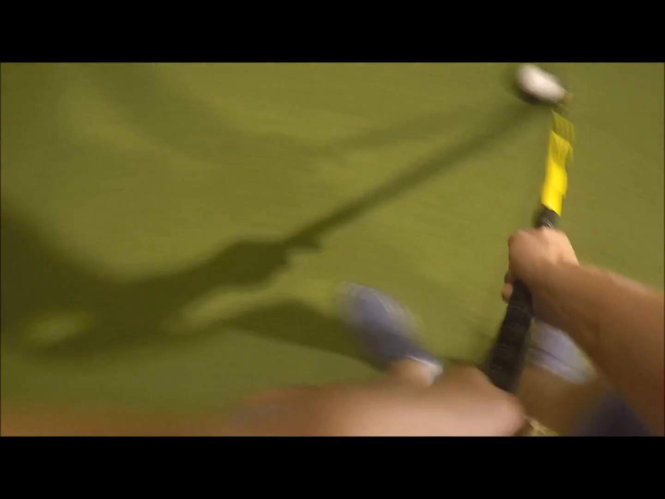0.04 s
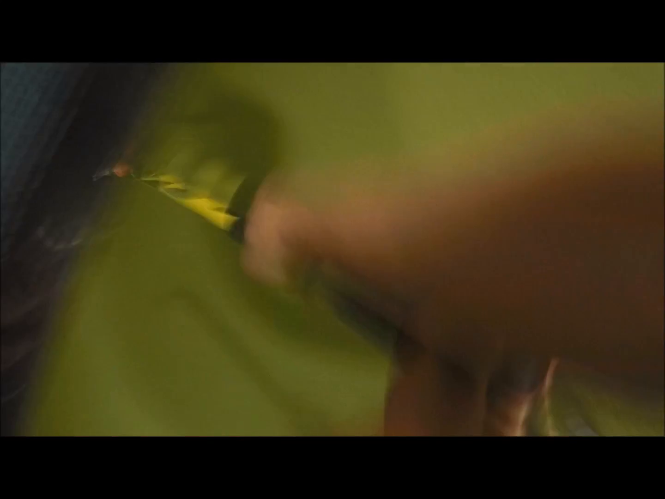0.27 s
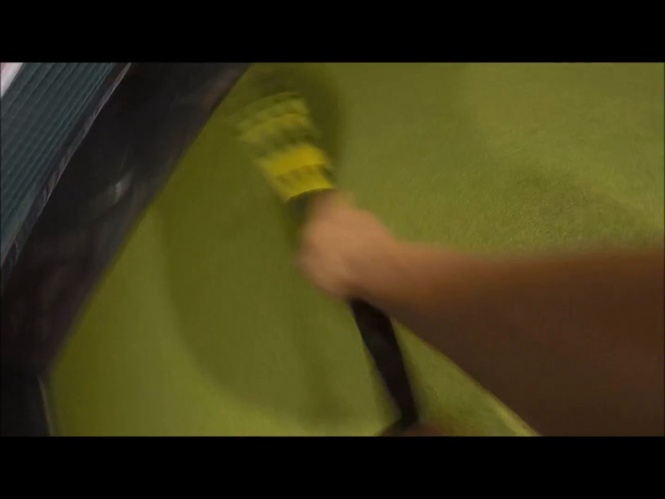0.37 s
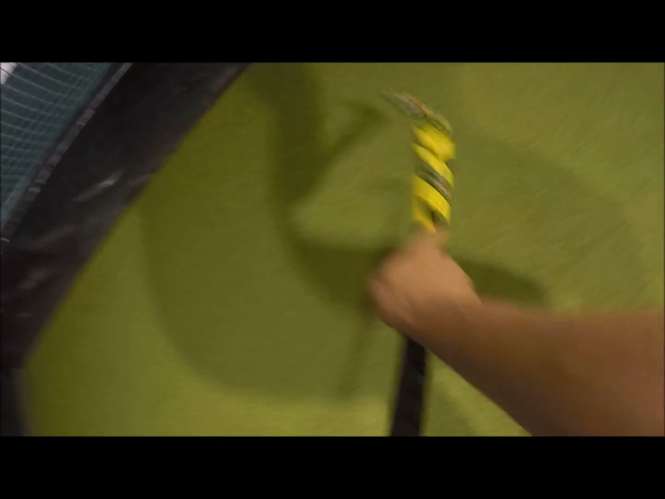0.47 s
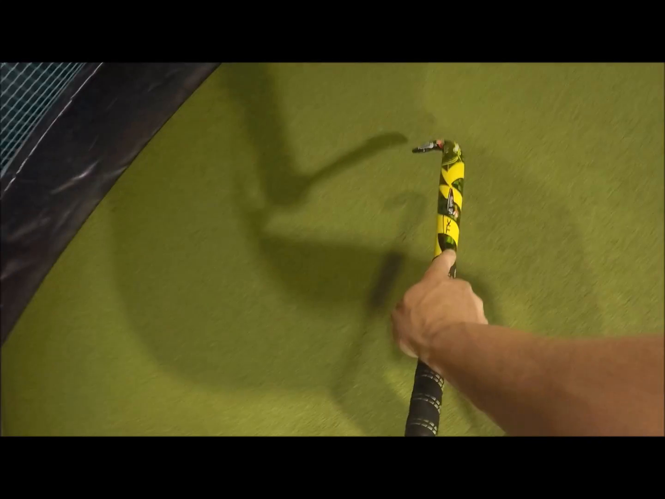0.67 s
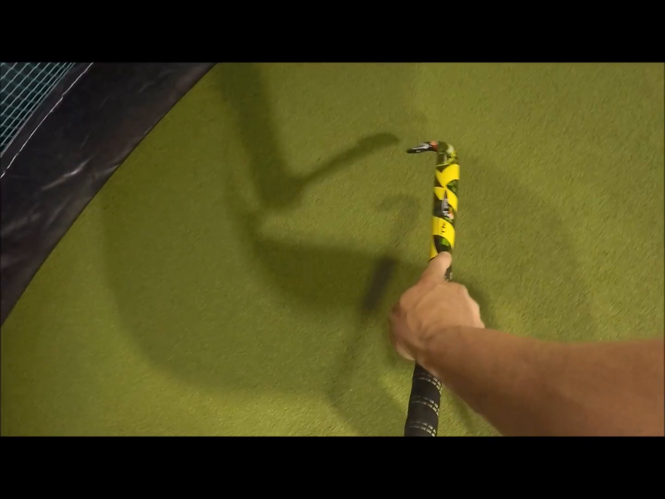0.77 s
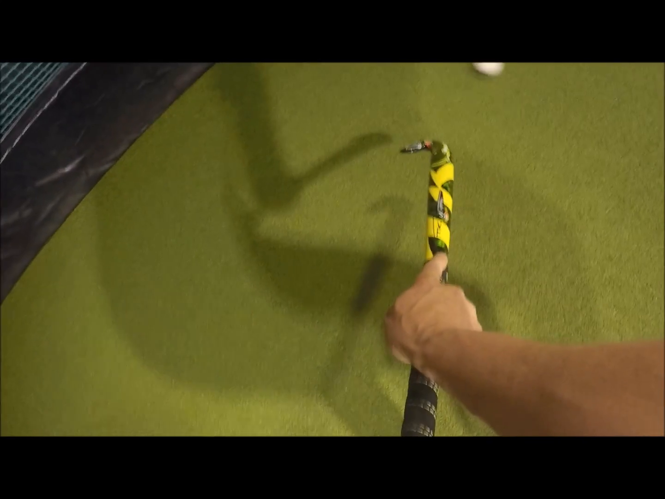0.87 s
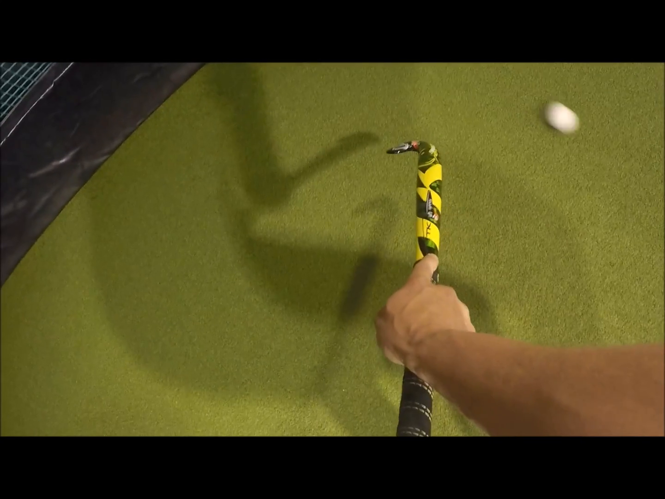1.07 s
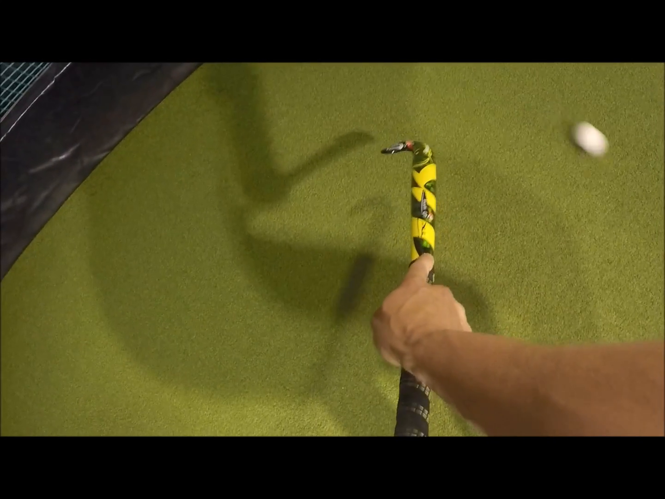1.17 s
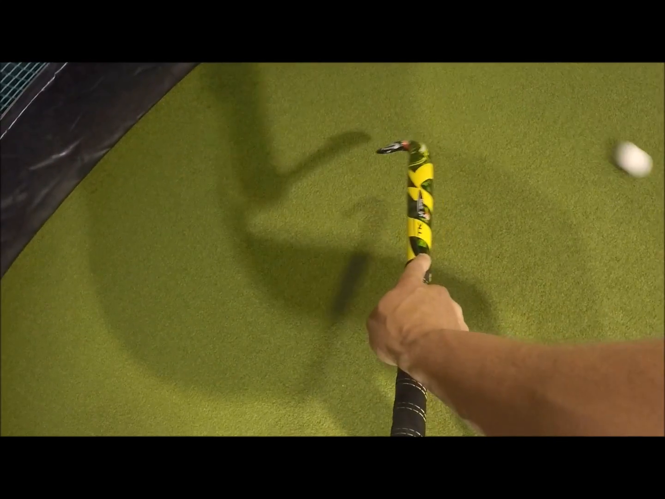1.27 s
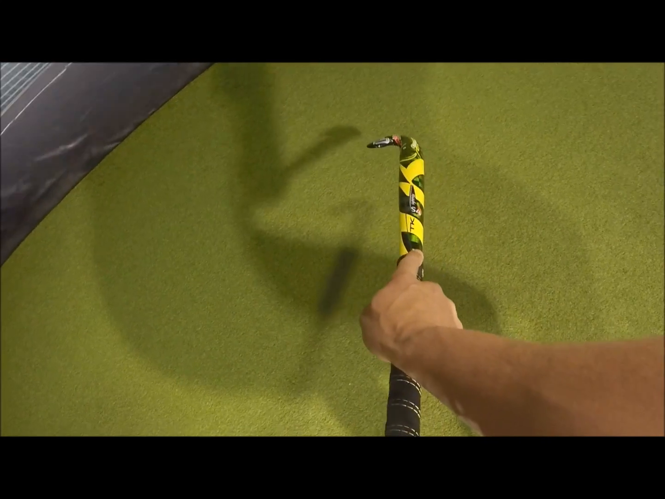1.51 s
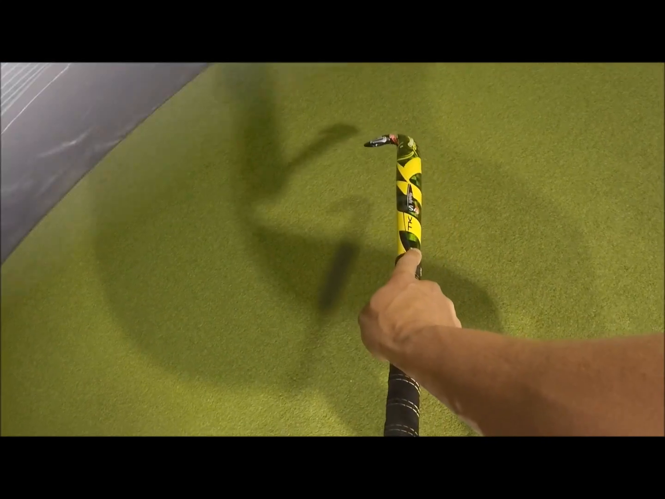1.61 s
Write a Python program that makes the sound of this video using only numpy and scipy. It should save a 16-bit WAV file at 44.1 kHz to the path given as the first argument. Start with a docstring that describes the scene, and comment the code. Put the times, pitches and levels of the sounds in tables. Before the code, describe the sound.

Sharp hockey stick knocks on a hard ball briefly overload a close microphone on an outdoor pitch. The ball slams a padded barrier with rattling netting, more clacks follow, then it lands softly and rolls over faint hiss.

```python
"""A hockey stick scuffs over artificial turf and strikes a hard ball in sharp, clattering knocks,
each one ringing the stick's modes. The ball slams into the padded pitch barrier, which booms while
its netting rattles, and the stick clacks twice more. In the quiet the ball thuds down and rolls back;
grit ticks, and a soft low pop follows over faint outdoor hiss, hum and whine.
The body-worn microphone overloads on the loudest blows."""
import sys
import numpy as np
from scipy import signal
from scipy.fft import rfft, irfft, next_fast_len
from scipy.io import wavfile
from scipy.ndimage import map_coordinates

SR = 44100
rng = np.random.default_rng(int(sys.argv[2]) if len(sys.argv) > 2 else 0)


def persist_wave(psi):
    """Save psi, clipped to +-1, as 16-bit WAV."""
    counts = np.round(np.clip(psi, -1, 1) * 32767).astype(np.int16)
    wavfile.write(sys.argv[1], SR, np.atleast_2d(counts).T)


N = 72765
CONTACT_ATTACK_S = 0.00067


def amp(db):
    """Decibels to gain."""
    return 10 ** (np.asarray(db) / 20)


def along(points, hz):
    """Read a curve of (Hz, value) points on a log frequency axis."""
    freqs, values = np.transpose(points)
    return np.interp(np.log(hz + 1), np.log(freqs + 1), values)


def clock():
    """Time of every sample in seconds."""
    return np.arange(N) / SR


def level(points):
    """A fader ride: gain per sample from (s, dB) points."""
    return amp(np.interp(clock(), *np.transpose(points)))


def filtered(x, response):
    """Equalise x with a gain given as a function of frequency."""
    size = next_fast_len(N + SR // 4)
    return irfft(rfft(x, size) * response(np.fft.rfftfreq(size, 1 / SR)), size)[:N]


def noise(colour):
    """Noise of rms 1, coloured by (Hz, dB) points."""
    x = filtered(rng.standard_normal(N), lambda hz: amp(along(colour, hz)))
    return x / x.std()


def fading(x, t60s):
    """Let each frequency of x die away at its own speed."""
    hz, t, bands = signal.stft(x, SR, nperseg=512)
    fade = amp(-60 * t / along(t60s, hz)[:, None])
    return signal.istft(bands * fade, SR, nperseg=512)[1][:N]


def decay(t, t60):
    """Exponential fall by 60 dB in t60 seconds."""
    return np.exp(-np.log(1000) * t / t60)


def rise(t, attack_s):
    """Exponential attack from 0 towards 1."""
    return 1 - np.exp(-t / attack_s)


def ring(modes, t, attack_s):
    """A struck body: damped (Hz, dB, t60) sines under a short attack."""
    partials = (amp(db) * decay(t, t60) * np.sin(2 * np.pi * hz * t) for hz, db, t60 in modes)
    return sum(partials) * rise(t, attack_s)


def wobble(rate):
    """A smooth random curve through rate points a second."""
    return map_coordinates(rng.standard_normal(int(N * rate / SR) + 4), [clock() * rate])


def tone(hz, waver, rate):
    """A sine whose pitch wanders by about the fraction waver."""
    return np.sin(2 * np.pi * np.cumsum(hz * (1 + waver * wobble(rate))) / SR)


def add(track, start_s, sound):
    """Mix a sound into the track at start_s."""
    i = round(start_s * SR)
    track[i:i + len(sound)] += sound[:N - i]


def background():
    """A bed of outdoor hiss and low rumble, with a faint hum and a fluttering whine."""
    # fader rides of hiss, hum and whine: time_s, level_db
    hiss_ride = [(0, -55.5), (.07, -62), (.16, -60), (.6, -79), (.98, -76), (1.29, -68.5), (1.48, -70),
                 (1.65, -73)]
    hum_ride = [(.9, -100), (1.13, -75), (1.21, -67), (1.255, -71), (1.285, -58), (1.345, -57.5),
                (1.39, -88)]
    whine_ride = [(.8, -90), (.95, -81), (1.25, -76.5), (1.45, -85.5)]
    # colours of hiss and rumble: freq_hz, relative_db
    hiss_colour = [(100, -1), (300, 5), (550, -0.5), (900, -5), (1600, -7.5), (4000, -9), (7000, -19),
                   (11000, -25), (15000, -30.5), (16500, -47.5)]
    rumble_colour = [(20, -2.5), (50, 6), (130, -7), (250, -13), (450, -29), (900, -53.5)]
    # partials of the whine: pitch_hz, relative_db
    partials = [(780, 0), (1045, -5), (1390, -8.5), (1600, -7.5)]
    flutter_db, rumble_db = 4.5, -63.5
    whine = sum(amp(db + flutter_db * wobble(rate=41)) * tone(hz, waver=.02, rate=25)
                for hz, db in partials)
    hiss = level(hiss_ride) * noise(hiss_colour)
    rumble = amp(rumble_db) * noise(rumble_colour)
    hum = level(hum_ride) * tone(hz=263, waver=.008, rate=8)
    return hiss + rumble + hum + level(whine_ride) * whine


def soft_pop():
    """One soft, low pop with a tiny click on its front."""
    # partials of the pop: pitch_hz, relative_db, t60_s
    modes = [(43.9, 0.5, 0.057), (96, -7, 0.036), (232.5, 3, 0.0091), (42.4, -14, 1)]
    out, t = np.zeros(N), clock()
    body = amp(-36) * ring(modes, t, attack_s=0.00089)
    click = amp(-34) * np.exp(-t / 0.00057) * rise(t, attack_s=.00005)
    add(out, start_s=1.4032, sound=body + click)
    return out


def grit_ticks():
    """Grit ticks in tiny bursts of noise."""
    # ticks of grit: start_s, level_db
    ticks = [(.686, -57.5), (.719, -59.5), (.923, -58.5), (1.3008, -55.5)]
    # colour of a tick: freq_hz, relative_db
    colour = [(400, 0), (1500, 1), (4200, -8), (12000, -21)]
    out, t = np.zeros(N), clock()
    for start_s, db in ticks:
        add(out, start_s, amp(db) * noise(colour) * decay(t, t60=0.015) * rise(t, CONTACT_ATTACK_S))
    return out


def ball_landing():
    """The ball touches the turf, lands with a dull thud and a puff of noise, and rolls back."""
    # modes of the first touch and of the thud: pitch_hz, relative_db, t60_s
    tap_modes = [(387, -48, .035), (922, -53, .04)]
    thud_modes = [(140.2, 7.5, 0.12), (201, -3, 0.16), (248.1, -4.5, 0.18), (332, -7.5, 0.078)]
    # colours of puff and roll: freq_hz, relative_db
    puff_colour = [(80, 12.5), (300, -1), (550, -13.5), (1000, -19), (1500, -32), (12000, -50)]
    roll_colour = [(30, -5), (90, .5), (170, -5), (350, -20.5), (700, -15), (1000, -30), (2200, -33),
                   (8000, -56)]
    # swell and fade of the roll: time_s, level_db
    roll_ride = [(.82, -110), (.92, -58.5), (1.0, -58.5), (1.1, -67), (1.2, -81.5), (1.45, -101)]
    tap_s, thud_s, puff_attack_s = .789, .7945, 0.0092
    t = clock()
    out = level(roll_ride) * noise(roll_colour)
    puff = amp(-43.5) * noise(puff_colour) * decay(t, t60=0.4) * rise(t, puff_attack_s)
    add(out, thud_s - puff_attack_s, puff)
    add(out, tap_s, ring(tap_modes, t, CONTACT_ATTACK_S))
    add(out, thud_s, amp(-36.5) * ring(thud_modes, t, attack_s=0.0046))
    return out


def turf_scuff():
    """The head drags on turf, sets the shaft droning, squeaks where it presses hardest and swishes on."""
    # fader rides of drag, shaft drone and follow-through: time_s, level_db
    drag_ride = [(.176, -74), (.183, -44), (.197, -39.5), (.209, -30.5), (.216, -28.5), (.222, -34.5),
                 (.25, -48.5), (.275, -54), (.32, -55.5), (.36, -57.5), (.405, -61.5), (.45, -120)]
    drone_ride = [(.178, -73), (.19, -36), (.21, -26.5), (.222, -30.5), (.25, -41), (.275, -62.5),
                  (.33, -110)]
    swish_ride = [(.18, -110), (.225, -45), (.25, -40.5), (.29, -46.5), (.33, -45), (.375, -51),
                  (.405, -52.5), (.46, -120)]
    # colours of drag, squeak and the swish that jolts the microphone: freq_hz, relative_db
    drag_colour = [(100, -25), (280, -9.5), (470, 0.5), (660, 1), (950, -11.5), (1450, -8), (2200, -19.5),
                   (2900, -16.5), (3900, -31.5), (6500, -33.5), (15000, -46.5)]
    squeak_colour = [(3800, -35.5), (4900, 13), (5600, -8.5), (6400, -25), (16000, -43)]
    swish_colour = [(25, -6), (55, 3), (130, -6.5), (300, -12.5), (700, -28.5), (2000, -27), (15000, -51.5)]
    squeak_s, squeak_width_s = .211, 0.0036
    pressure = np.exp(-.5 * ((clock() - squeak_s) / squeak_width_s) ** 2)
    drag = level(drag_ride) * noise(drag_colour)
    drone = level(drone_ride) * tone(hz=464.5, waver=.015, rate=49)
    squeak = amp(-37) * pressure * noise(squeak_colour)
    swish = level(swish_ride) * noise(swish_colour)
    return drag + drone + squeak + swish


def barrier_slam():
    """The ball slaps the padding; the boards boom and rumble and the netting rattles."""
    # snaps of the padded cover: start_s, level_db, t60_s
    slaps = [(.4085, -13, .012), (.4122, -21, .008), (.4150, -24, .018)]
    # blows on the boards: start_s, gain_db
    slams = [(.4101, -6), (.5470, -28)]
    # modes of the boards: pitch_hz, relative_db, t60_s
    board_modes = [(65.5, -13.5, 0.33), (104.4, 1.5, .064), (133.85, -1, .085), (177, -3, 0.087),
                   (244.3, -1, .11), (363, -6.5, 0.069), (413, -14, .13), (551, -18, .13),
                   (674, -15.5, .09)]
    # colours of cover, boards and netting: freq_hz, relative_db
    slap_colour = [(300, 18), (700, 14), (1500, 10), (2400, 5.5), (4800, -7.5), (6200, 2.5), (7500, -3.5),
                   (12000, -12), (16000, -13)]
    rumble_colour = [(25, -7.5), (70, -5.5), (140, -1), (280, -5.5), (550, -8.5), (900, -26.5),
                     (2000, -39.5), (5000, -65)]
    rattle_colour = [(300, 4.5), (900, 6), (2000, -4), (4000, -9), (8000, -15.5), (15000, -24.5)]
    # ring-out of boards and netting: freq_hz, t60_s
    rumble_t60 = [(40, 1.4), (130, 0.63), (300, 0.42), (600, .43), (2000, .15)]
    rattle_t60 = [(1000, .32), (4000, 0.36), (14000, .23)]
    out, t = np.zeros(N), clock()
    for start_s, db, t60 in slaps:
        add(out, start_s, amp(db) * noise(slap_colour) * decay(t, t60))
    for start_s, db in slams:
        add(out, start_s, amp(db) * ring(board_modes, t, attack_s=0.00082))
    rumble = amp(-25) * fading(noise(rumble_colour), rumble_t60)
    rattle = amp(-32.5) * fading(noise(rattle_colour), rattle_t60)
    add(out, slams[0][0], rumble + rattle)  # on the first blow only
    return out


def stick_knocks():
    """Each contact layers the clack of the stick's modes, a low thock, a high ping and a brief crack; the row
    at 0.4511 s is the ball's second blow on the barrier, voiced with the same layers."""
    # hard contacts of the stick, plus the ball's second blow on the barrier at 0.4511 s: start_s, clack_db,
    # ping_db, crack_db, thock_db, thock_hz, thock_t60_s
    knocks = [(0.1835, -28, -48, -49.5, -28, 900, .03), (0.1879, -39, -52.5, -66, -21, 430, .036),
              (.2232, -10, -38.5, -35, -11.5, 620, .036), (.2333, -19.5, -43.5, -48.5, -10.5, 461, .035),
              (.2368, -17, -41.5, -39, -5.5, 543, .02), (.3245, -11.5, -33.5, -27.5, -6, 490, .019),
              (0.3299, -25.5, -40.5, -48.5, -9, 340, .019), (.3384, -11.5, -20.5, -28, -25, 641, .02),
              (0.3443, -7.5, -21.5, -12, 5.5, 361.1, .018), (0.3486, -12.5, -32.5, -33.5, -9, 408, .022),
              (0.4511, -40.5, -48, -45.5, -7, 378, .014), (0.4547, -24, -43.5, -44.5, -23, 500, .012),
              (0.4617, -24, -36, -37.5, -20, 610, .034), (0.4662, -21.5, -40, -42.5, -29.5, 515, .016),
              (.5115, -14, -25, -15, -14, 600, .014), (0.515, -6, -25.5, -17.5, -16, 600, .02),
              (.5357, -16.5, -23.5, -30.5, -25.5, 525, .019), (0.5378, -14, -24.5, -32, -7, 529.5, .014),
              (0.544, -25, -41.5, -42, -37.5, 600, .02)]
    # modes of the stick: pitch_hz, relative_db, t60_s
    stick_modes = [(708, -13.5, .026), (1030, -11.5, .019), (1442, -4, .0095), (1753, -3, .014),
                   (2100, -4.5, .014), (2630, -9.5, .011), (3164, -12, .015)]
    # colour of the crack: freq_hz, relative_db
    crack_colour = [(300, 16), (1500, 7.5), (3200, 2.5), (3900, -8), (5200, -2.5), (8000, -4.5),
                    (15000, -27)]
    detune, scatter_db = 0.015, 2  # from one contact to the next
    ping_hz, ping_t60_s = 4840, 0.0092  # the stick's highest mode
    snap_attack_s = 0.00023
    out, t = np.zeros(N), clock()[:SR // 10]
    crack_noise = noise(crack_colour)
    for start_s, clack_db, ping_db, crack_db, thock_db, thock_hz, thock_t60 in knocks:
        chance = rng.standard_normal((len(stick_modes), 2))
        modes = [(hz * (1 + detune * pitch_draw), db + scatter_db * level_draw, t60)
                 for (hz, db, t60), (pitch_draw, level_draw) in zip(stick_modes, chance)]
        # neighbouring modes start in opposite polarity
        clack = ring(modes[::2], t, snap_attack_s) - ring(modes[1::2], t, snap_attack_s)
        thock = ring([(thock_hz, thock_db, thock_t60)], t, CONTACT_ATTACK_S)
        ping = ring([(ping_hz, ping_db, ping_t60_s)], t, CONTACT_ATTACK_S)
        burst = np.roll(crack_noise, rng.integers(N))[:len(t)]
        crack = burst * decay(t, t60=.01) * rise(t, snap_attack_s)
        add(out, start_s, amp(clack_db) * clack + thock + ping + amp(crack_db) * crack)
    return out


def scene():
    """The mono mix, with a touch of open-air reverb on the stick alone."""
    # reverb of the open pitch: freq_hz, t60_s
    reverb_t60 = [(200, 0.27), (1000, .12), (4000, 0.034), (12000, 0.052)]
    wet_db = -30.5
    stick = stick_knocks() + turf_scuff()
    tail = fading(rng.standard_normal(N), reverb_t60)
    reverb = amp(wet_db) * signal.fftconvolve(stick, tail / np.linalg.norm(tail))[:N]
    mix = stick + reverb + barrier_slam() + ball_landing() + grit_ticks() + soft_pop() + background()
    return mix[None]


def record(dry):
    """The microphone soft-clips the loudest peaks and sheds the deepest bass and the highest treble."""
    ceiling, hardness = .41, 4
    low_cut_hz, high_cut_hz = 24, 15600
    clipped = dry[0] / (1 + np.abs(dry[0] / ceiling) ** hardness) ** (1 / hardness)

    def passband(hz):
        """A gentle low cut and a steep high cut."""
        return hz / np.hypot(low_cut_hz, hz) / np.hypot(1, (hz / high_cut_hz) ** 44)

    return filtered(clipped, passband)[None]


dry = scene()
out = record(dry)
persist_wave(out)
```